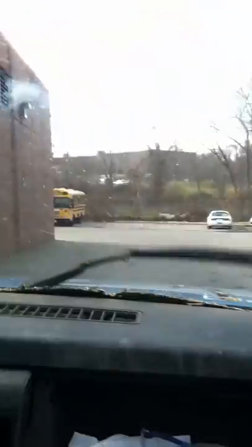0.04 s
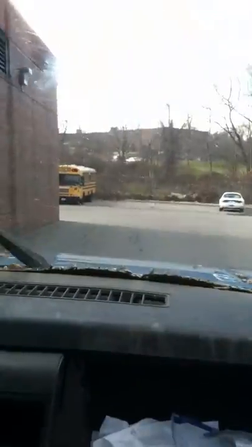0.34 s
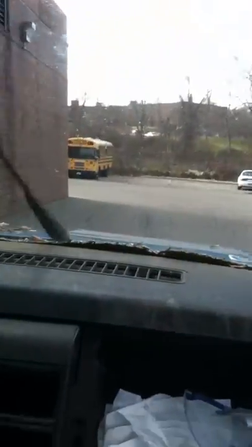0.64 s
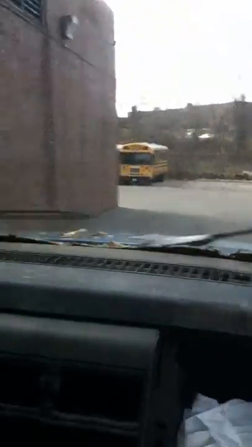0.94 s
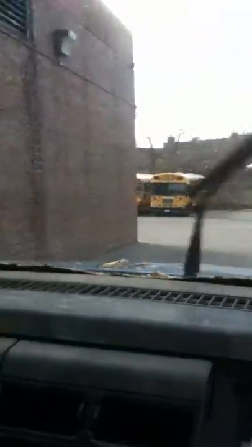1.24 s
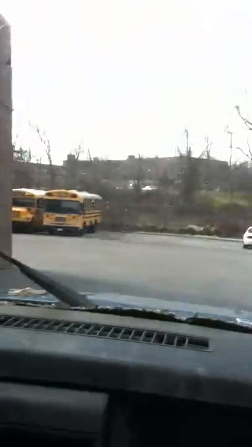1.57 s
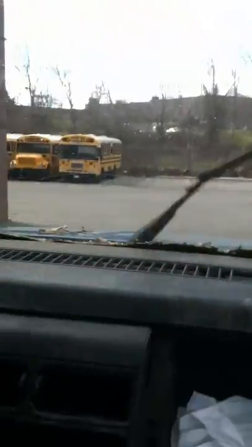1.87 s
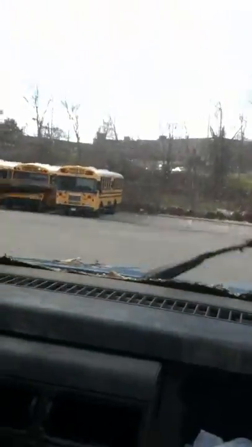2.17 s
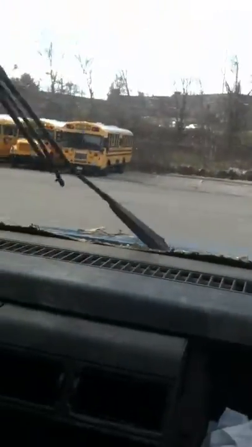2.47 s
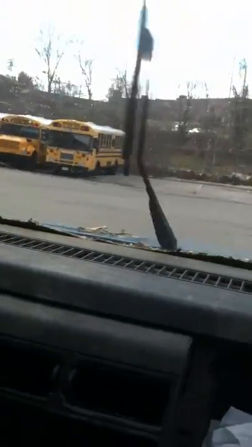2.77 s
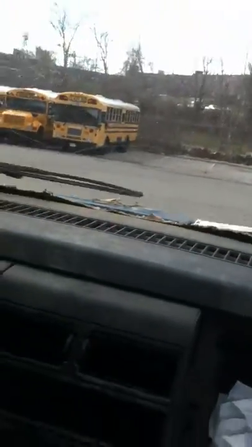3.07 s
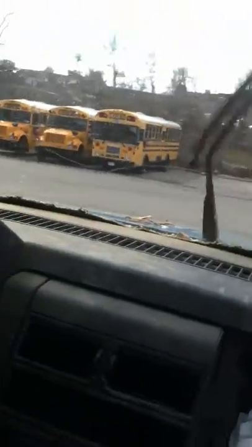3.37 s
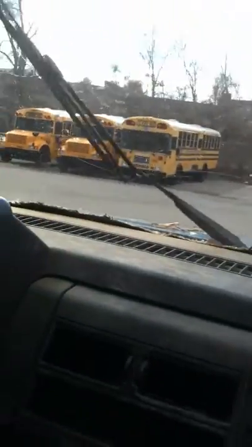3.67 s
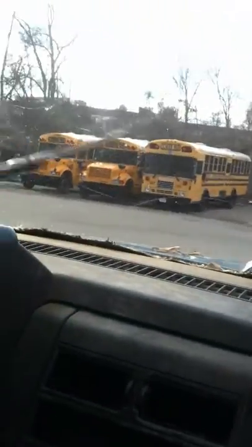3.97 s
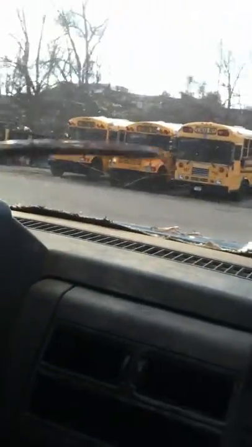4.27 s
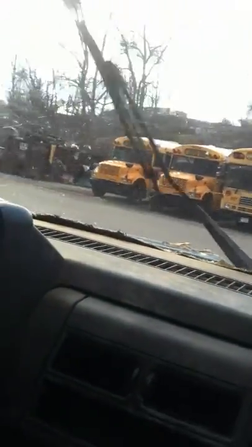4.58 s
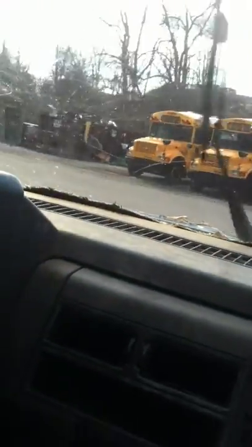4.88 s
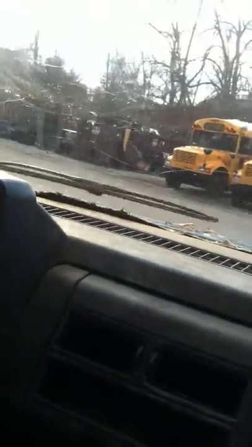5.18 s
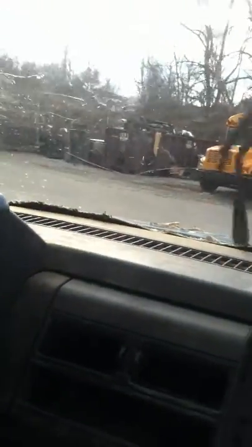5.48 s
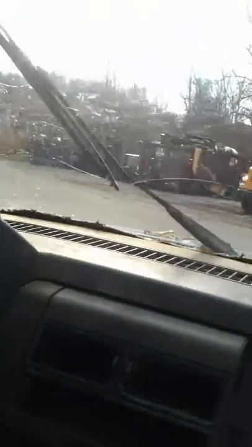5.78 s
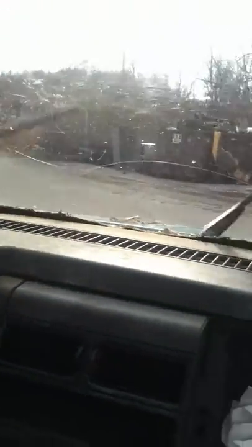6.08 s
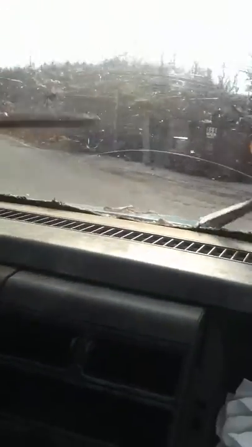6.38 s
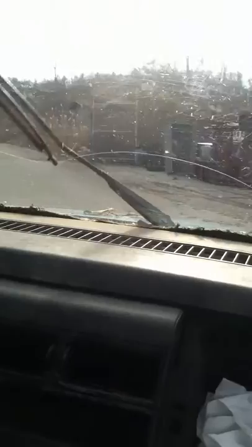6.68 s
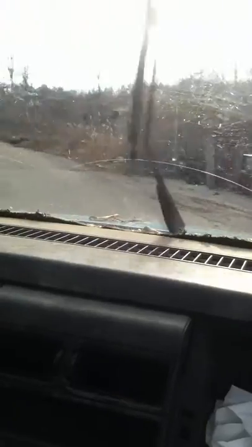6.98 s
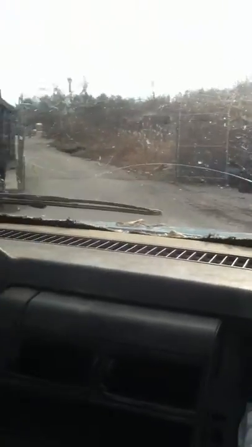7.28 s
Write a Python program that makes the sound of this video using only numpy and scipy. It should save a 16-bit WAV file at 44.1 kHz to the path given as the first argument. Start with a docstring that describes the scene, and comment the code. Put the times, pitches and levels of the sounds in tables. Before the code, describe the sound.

Wipers drag across a dry windshield, heard close up from inside a slowly moving vehicle. Each outward stroke starts with a clack and becomes a harsh, rasping screech of about half a second. The blade then flips with a soft thud and glides back with a thin, high squeak. This repeats seven times, about once a second, while the engine drones and the tyres rumble quietly underneath.

```python
"""Wipers on a dry windshield

Heard from inside a slowly moving vehicle. On each outward stroke the rubber lip catches, then sticks
and slips about a thousand times a second, in many patches at once: a harsh screech. The blade flips
over with a clack and glides back with thin squeaks. Below, the engine drones and the tyres rumble."""
import sys
import numpy as np
from scipy import signal
from scipy.fft import rfft, irfft, next_fast_len
from scipy.io import wavfile
from scipy.ndimage import uniform_filter1d, map_coordinates

SR = 44100
rng = np.random.default_rng(int(sys.argv[2]) if len(sys.argv) > 2 else 0)


def log_audio(samples):
    """Write samples as a 16-bit WAV file to the path given in sys.argv[1]."""
    # one column per channel
    frames = np.atleast_2d(samples).T
    # limit to full scale, then quantise
    limited = np.clip(frames, -1, 1)
    pcm = np.round(limited * 32767).astype(np.int16)
    wavfile.write(sys.argv[1], SR, pcm)


N = 327663

# Outward strokes. Each row: start and length in seconds, then levels in dB of the rasp, the judder
# (within the rasp), and the groan, shriek, squeal and squawk.
STROKES = [(0.1951, .459, -16.3, -27, -4, -1, -8, -9), (1.2406, .459, -17.6, -28, -5, -1, -8, -9),
           (2.2947, 0.46, -17.5, -26, -12, -2, -6, -1), (3.3408, 0.46, -16.8, -24, -14, -2, -8.5, -1.5),
           (4.3839, .469, -15.8, -20, -7.5, -2.5, -5.5, -3),
           (5.4344, 0.47, -16.8, -21, -4.5, -1.5, -4.5, -3), (6.4863, .461, -17.2, -24, .5, -2, -4.5, -7)]
# How each tone moves. Each row: seconds into the stroke, pitch in Hz, level in dB before the stroke's own.
SQUEAL_PATH = [(.02, 905, -38), (.15, 905, -34), (.24, 976.4, -24.5), (.38, 985, -24), (.465, 1078, -29)]  # climbs all through the stroke
SHRIEK_PATH = [(.03, 1810, -34.5), (.075, 1810, -30.5), (.11, 1715, -23.5), (.135, 1790, -15.5),
               (.165, 1813, -26.5), (.3, 1810, -29)]  # loudest in the first half
GROAN_PATH = [(.028, 889, -28), (.058, 915, -21), (.088, 892, -22.5), (.112, 855, -23), (.138, 875, -29)]  # sags early on
SQUAWK_PATH = [(-.125, 2126, -24.5), (-.06, 2097, -23), (-.038, 1938, -21.5), (-.018, 2077, -19.5),
               (0, 2221, -39.5)]  # dips, then rises; timed from the stroke's end
# What each tone is made of. Each row: harmonic (a multiple of the slip rate), level in dB.
SQUEAL_TONE = [(1, 0.5), (2, -5.5), (3, 0.5), (4, -7.5), (5, -24.5), (6, -9)]
SHRIEK_TONE = [(2, -2.5), (3, -6), (4, -12.5), (5, -8.5), (7, -15)]
GROAN_TONE = [(1, 0), (2, -7), (3, -11.5), (4, -2), (5, -10), (7, -12)]
SQUAWK_TONE = [(2, 0), (3, -11), (4, -8), (6, -15), (8, -26)]
# The steel arm's ring. Each row: pitch in Hz, level in dB, seconds to fade by 60 dB.
ARM_RING = [(1050, -62, .4), (2190, -57, .8), (3880, -61, .6), (5250, -68, .8)]
GRIP_S, BUILD_S, RELEASE_S = .0078, .037, .057  # the lip takes hold, drags harder, lets go
JUDDER_START_HZ, JUDDER_END_HZ = 290, 385
def screeches():
    """Dry rubber rasps over the glass while tones come and go; the arm rings after the lip lets go."""
    out, ring_t = np.zeros(N), np.arange(SR // 2) / SR
    ring = sum(amp(db - 60 * ring_t / fade_s) * np.sin(2 * np.pi * hz * ring_t)
               for hz, db, fade_s in ARM_RING)
    for start, length, rasp_db, judder_db, groan_db, shriek_db, squeal_db, squawk_db in STROKES:
        n = int(length * SR)
        t = np.arange(n) / SR
        pressure = np.clip(np.minimum((t - GRIP_S) / BUILD_S, (length - t) / RELEASE_S), 1e-3, 1)
        drag = pressure * amp(rasp_db + .7 * wobble(19, n))  # the glass is unevenly dry
        # the blade judders on its arm, faster as the stroke goes on
        judder_hz = np.linspace(JUDDER_START_HZ, JUDDER_END_HZ, n) * (1 + .08153 * wobble(70.35, n))
        judder = np.sin(phase_of(judder_hz)) * amp(4 * np.tanh(wobble(50, n)))
        squeal = lip_tone(SQUEAL_PATH, SQUEAL_TONE, t, judder,
                          rough=.42, flutter_db=7.5, drift=.014, grip_db=3.5)
        shriek = lip_tone(SHRIEK_PATH, SHRIEK_TONE, t, judder,
                          rough=.22, flutter_db=5.5, drift=.013, grip_db=2)
        squawk = lip_tone(SQUAWK_PATH, SQUAWK_TONE, t - length, judder,
                          rough=.2, flutter_db=5.5, drift=.012, grip_db=2)
        groan = lip_tone(GROAN_PATH, GROAN_TONE, t, judder,
                         rough=.08, flutter_db=2.5, drift=.006, grip_db=1)
        tones = pressure * amp(squeal_db) * squeal + amp(shriek_db) * shriek
        tones += amp(squawk_db) * squawk + amp(groan_db) * groan
        squeal_hz, _ = curves(SQUEAL_PATH, t)
        # the more of the lip slips in step, the less is left to rasp
        scrape = rasp(squeal_hz, judder) / np.sqrt(1 + .5 * power(tones, size=600) / drag ** 2)
        stroke = tones + drag * (scrape + amp(judder_db) * judder)
        add(out, start, stroke * signal.windows.tukey(n, .02))
        add(out, start + length, ring)
    return out


def lip_tone(path, harmonics, t, judder, rough, flutter_db, drift, grip_db):
    """A stretch of lip slips in step and sings; the path gives the pitch of its first listed harmonic."""
    n = len(t)
    path_hz, db = curves(path, t)
    wander = drift * (wobble(80, n) + wobble(20, n))
    slip_hz = path_hz / round(harmonics[0][0]) * (1 + wander)
    phase = phase_of(slip_hz) + rough * wobble(350, n) + .115 * judder
    tone = np.zeros(n)
    for k, level in harmonics:
        flutter = amp(flutter_db * np.tanh(wobble(65.32, n)))
        tone += amp(level) * unit(flutter * np.sin(round(k) * phase + rng.uniform(0, 2 * np.pi)))
    fade = np.clip(np.minimum(t - path[0][0], path[-1][0] - t) / .0037 + 1, 0, 1)
    return tone * amp(db + grip_db * np.tanh(wobble(28, n))) * fade


# Patches of the lip. Each row: slip rate as a multiple of the squeal's pitch, level in dB.
LIP_PATCHES = [(.84, -7), (.91, -5), (1.01, -5), (1.08, -1), (1.27, -6)]
# How glass and dashboard colour the rasp. Each row: frequency in Hz, level in dB.
GLASS_COLOUR = [(40, -59), (130, -34), (280, -13.5), (500, -15), (750, -10.5), (1100, -11), (1400, -6),
                (2000, -2.5), (2600, -1.5), (3500, -4), (4700, -2.5), (5200, -12), (6900, -11.5),
                (8600, -29), (12500, -65.5)]
# Where the blade likes to ring. Each row: frequency in Hz, width in Hz, boost in dB.
BLADE_PEAKS = [(345, 128, 12), (620, 100, 6.5), (3058, 140, 2), (3990, 180, 2), (5757, 207, 6.5)]
def rasp(pitch_hz, judder):
    """Patches of the lip slip out of step with each other and shake the glass."""
    def colour(hz):
        boost = sum(db / (1 + (2 * (hz - centre) / width) ** 2) for centre, width, db in BLADE_PEAKS)
        return along(GLASS_COLOUR, hz) + boost

    n = len(pitch_hz)
    force = amp(-8) * rng.standard_normal(n)
    for ratio, db in LIP_PATCHES:
        rate_hz = ratio * pitch_hz * np.exp(.022 * wobble(40, n))
        force += amp(db + 4 * wobble(35, n)) * slips(rate_hz, jitter=.028, scatter_db=2)
    # the patches share one spring: when one bites harder, the others ease
    force *= amp(1.07 * wobble(60, n)) / np.sqrt(power(force, size=500))
    return unit(coloured(force * (1 + .2 * judder), colour))


def slips(rate_hz, jitter, scatter_db):
    """One sharp pulse each time the rubber lets go, uneven in time and size."""
    n = len(rate_hz)
    cycles = np.cumsum(rate_hz) / SR
    count = int(cycles[-1])
    late, size = rng.standard_normal((count, 2)).T
    centres = np.interp(np.arange(count) + rng.random() + jitter * late, cycles, np.arange(n))[:, None]
    # a pulse falls between samples, so spread it over its neighbours
    nearby = centres.astype(int) + np.arange(-7, 9)
    offset = nearby - centres
    pulses = np.sinc(offset) * np.sinc(offset / 8) * amp(scatter_db * size)[:, None]
    train = np.bincount(np.clip(nearby, 0, n - 1).ravel(), pulses.ravel(), n)
    return unit(train - train.mean())


# The colour of a clack. Each row: frequency in Hz, level in dB.
CLACK_COLOUR = [(30, -44), (120, -23), (300, -4), (1100, -7), (1700, -0.5), (2300, -1.5), (3000, -8),
                (4000, 1), (5200, -5), (7500, -7.5), (12000, -73.5)]
# Each clack: seconds from the turn, peak in dB, treble setting in dB (-11.5 leaves the colour as it is).
TICK, CATCH, FLIP = (-.0505, -35, -26), (0, -14, -19), (.06, -28, -47)
def clacks():
    """The blade ticks and catches as a stroke starts, and flips over after it ends."""
    out, t = np.zeros(N), np.arange(SR // 5) / SR
    fade_s, treble_share = .03, [(3000, .018), (6000, .98)]
    for start, db, treble_db in every_stroke([TICK, CATCH], [FLIP]):
        rise_s = .000097 / amp(db)  # rubber gives way slowly under a gentle touch
        burst = rng.standard_normal(len(t)) * amp(-60 * t / fade_s) * (1 - np.exp(-t / rise_s))
        colour = lambda hz: along(CLACK_COLOUR, hz) + along(treble_share, hz) * (treble_db + 11.5)
        clack = coloured(burst, colour)
        add(out, start, amp(db) * clack / np.abs(clack).max())
    return out


# Thuds at a stroke's two ends. Each row: seconds from that end, peak in dB.
START_THUDS = [(-.103, -33)]
END_THUDS = [(.022, -30), (.07, -29)]
# Stray knocks of the body. Each row: start in seconds, peak in dB.
BODY_KNOCKS = [(2.326, -22.5), (2.932, -29)]
# The ring of the wiper rods and their cover. Each row: pitch in Hz, level in dB, seconds to fade by 60 dB.
THUD_RING = [(161.3, -5, 0.1), (267, -6.5, .12), (345.7, -2, 0.13), (405.3, -4.5, 0.077), (626, -9.5, 0.1),
             (976, -12, 0.098)]
def thuds():
    """The wiper rods take up their slack and the body knocks; each thud rings a little differently."""
    out, t = np.zeros(N), np.arange(SR // 5) / SR
    for start, db in every_stroke(START_THUDS, END_THUDS) + BODY_KNOCKS:
        ring = np.zeros(len(t))
        for hz, level, fade_s in THUD_RING:
            fade = amp(level + rng.normal(0, 2.6) - 60 * t / fade_s)
            pitch_hz = hz * rng.normal(1, .054)
            ring += fade * np.sin(2 * np.pi * pitch_hz * t + rng.uniform(0, 2 * np.pi))
        ring *= 1 - np.exp(-t / .0035)  # soften the start
        add(out, start, amp(db) * ring / np.abs(ring).max())
    return out


# Return strokes. Each row: the whistle's start and length in seconds, then levels in dB of the whistle,
# its lead-in chirp, its closing chirp and its undertone.
RETURNS = [(0.883, .058, -34.5, -45, -55, -62), (1.927, .066, -34, -46.5, -51, -44),
           (2.992, .058, -36.5, -58, -53, -65), (4.04, .052, -38, -57, -53, -65),
           (5.078, .068, -38, -44, -59, -64), (6.142, .055, -35, -42, -47, -60),
           (7.147, 0.097, -35.5, -40, -43, -42)]
# Now and then the lip snags. Each row: start and length in seconds, pitch in Hz, level in dB.
SNAGS = [(1.714, .025, 5625, -53), (4.866, 0.014, 5720, -36), (5.892, .022, 5670, -45)]
# Each small squeak: delay and length in seconds, pitch in Hz and, for the first two, level in dB.
FLIP_SQUEAK, FAINT_START = (.016, .04, 9457, -47.5), (-.11, .02, 5218, -56)
LEAD_IN, UNDERTONE, CLOSING = (-.022, .044, 5720), (.02, .05, 2225), (-.012, .042, 8095)
WHISTLE_HZ = 5180
def squeak_notes():
    """The lip squeaks as it folds over, then plays the same few notes on each return."""
    notes = every_stroke([], [FLIP_SQUEAK]) + SNAGS
    for start, length, whistle_db, lead_db, closing_db, under_db in RETURNS:
        notes += [timed_from(start, FAINT_START),
                  (start, length, WHISTLE_HZ, whistle_db),
                  (*timed_from(start, LEAD_IN), lead_db),
                  (*timed_from(start, UNDERTONE), under_db),
                  (*timed_from(start + length, CLOSING), closing_db)]
    return notes


# What a squeak is made of. Each row: multiple of its pitch, level in dB.
SQUEAK_TONE = [(1, 6), (.81, -19), (2, -27.5)]
SQUEAK_RISE, SQUEAK_FALL = .23, .52  # shares of a squeak's length
def squeaks(sag=.008, waver=.003, rough=.28, scratch_db=-22):
    """On the way back only the lip's edge sings: short, scratchy whistles that swell and sag in pitch."""
    out = np.zeros(N)
    for start, length, hz, db in squeak_notes():
        n = int(length * SR)
        progress = np.linspace(0, 1, n)
        pitch_hz = hz * (1 - sag * (progress - .5) + waver * wobble(205, n))
        phase = phase_of(pitch_hz) + rough * wobble(1100, n)
        swell = np.clip(np.minimum(progress / SQUEAK_RISE, (1 - progress) / SQUEAK_FALL), 0, 1)
        swell *= amp(db + 1.6 * wobble(110, n))
        whistle = sum(amp(level) * np.sin(k * phase) for k, level in SQUEAK_TONE)
        add(out, start, swell * (whistle + amp(scratch_db) * noise(HISS_COLOUR, n)))
    return out


# How long the cabin echoes. Each row: frequency in Hz, seconds to fade by 60 dB.
CABIN_FADE = [(150, 0.22), (1000, .09), (4000, .075), (10000, .065)]
def cabin_echo(sound):
    """The small cabin answers with a short, dense echo in which low notes last longest."""
    hz, t, spectrum = signal.stft(rng.standard_normal(SR // 4), SR, nperseg=256)
    fade = amp(-60 * t / along(CABIN_FADE, hz)[:, None])
    _, tail = signal.istft(spectrum * fade, SR, nperseg=256)
    return signal.fftconvolve(sound, tail / np.linalg.norm(tail))[:N]


# The hiss in the swish and the squeaks. Each row: frequency in Hz, level in dB.
HISS_COLOUR = [(300, -9.5), (1500, -7.5), (2200, 2), (3000, -4), (4300, 3), (5200, -5.5), (7000, -3),
               (9000, -15.5), (12000, -46)]
def swish():
    """Air and gliding rubber hiss faintly; the hiss dips while the blade rests at either end."""
    resting = np.zeros(N)
    for start, pause_s in every_stroke([(-.17, .17)], [(.025, .16)]):
        add(resting, start, np.hanning(int(pause_s * SR)))
    level_db = -55.5 - 4.3 * resting + 3.3 * wobble(40, N) + .66 * wobble(5.4, N)
    return amp(level_db) * noise(HISS_COLOUR, N)


# How loud the engine is. Each row: time in seconds, level in dB before trim_db is added.
ENGINE_LEVELS = [(0.0, -54), (0.12, -44.5), (1.38, -47), (1.41, -42.5), (2.26, -42), (3.29, -54.5),
                 (4.14, -42), (4.72, -50), (6.52, -43.5), (6.75, -53), (7.33, -40.5), (7.43, -53)]
def engine(firing_hz=159.6, drift=.0252, trim_db=-2.5):
    """The engine's firing note booms in the cabin, with faint notes an octave below and above."""
    level_db, = curves(ENGINE_LEVELS, np.arange(N) / SR)
    pitch_hz = firing_hz * (1 + drift * wobble(7, N))
    phase = phase_of(pitch_hz) + .28 * wobble(30, N)
    drone = np.sin(phase) + amp(-21.5) * np.sin(phase / 2) + amp(-22.5) * np.sin(2 * phase)
    return amp(level_db + trim_db) * unit(amp(2.2 * wobble(25, N)) * drone)


# How loud the tyres are. Each row: time in seconds, level in dB.
TYRE_LEVELS = [(0.0, -43), (0.68, -46.5), (2.34, -41.5), (2.54, -45), (3.68, -45.5), (4.12, -45),
               (4.86, -46.5), (5.77, -43), (7.12, -42), (7.43, -42.5)]
# The colour of their rumble. Each row: frequency in Hz, level in dB.
RUMBLE_COLOUR = [(20, -44), (40, -27.5), (65, -13), (120, 4), (200, -2.5), (330, -2), (480, -8.5),
                 (800, -12), (1000, -14), (1400, -21), (3000, -31.5), (12000, -98.5)]
def tyres():
    """The tyres rumble, a little louder and softer over the bumps."""
    level_db, = curves(TYRE_LEVELS, np.arange(N) / SR)
    return amp(level_db + 1.8 * wobble(14, N)) * noise(RUMBLE_COLOUR, N)


# Seams in the road. Each row: middle of the jolt in seconds, level in dB.
ROAD_SEAMS = [(0.099, -41), (4.311, -40)]
# The cabin's boom. Each row: frequency in Hz, level in dB.
BOOM_COLOUR = [(50, -28), (90, -6), (125, 5), (170, -12), (400, -40), (1500, -88)]
def jolts(length_s=.18):
    """Each seam the tyres cross makes the cabin boom briefly."""
    out, n = np.zeros(N), int(length_s * SR)
    for middle, db in ROAD_SEAMS:
        add(out, middle - length_s / 2, amp(db) * np.hanning(n) * noise(BOOM_COLOUR, n))
    return out


def every_stroke(at_start, at_end):
    """Repeat rows for all strokes, timed from each one's start and from its end."""
    events = []
    for start, length, *_ in STROKES:
        events += [timed_from(start, row) for row in at_start]
        events += [timed_from(start + length, row) for row in at_end]
    return events


def timed_from(moment, row):
    """Turn the delay that opens a row into a time in the scene."""
    return (moment + row[0], *row[1:])


def amp(db):
    """Turn decibels into a number to multiply by."""
    return 10 ** (np.asarray(db) / 20)


def unit(x):
    """Scale x to an average power of 1."""
    return x / np.sqrt(np.mean(x ** 2) + 1e-20)


def power(x, size):
    """The running average of x squared, over size samples."""
    return np.abs(uniform_filter1d(x ** 2, size=size)) + 1e-12


def phase_of(hz):
    """The angle a wave has turned through as its pitch changes."""
    return 2 * np.pi * np.cumsum(hz) / SR


def along(points, hz):
    """Read a table between its frequencies, with octaves evenly spaced."""
    known_hz, values = np.transpose(points)
    return np.interp(np.log(hz + 1), np.log(known_hz + 1), values)


def curves(rows, t):
    """Read each column after the first at the times t."""
    times, *columns = np.transpose(rows)
    return [np.interp(t, times, column) for column in columns]


def wobble(rate, n):
    """A smooth curve of n samples through rate random points a second."""
    return map_coordinates(rng.standard_normal(int(n * rate / SR) + 4), [np.arange(n) * rate / SR])


def coloured(x, level):
    """Turn each frequency in x up or down by level(hz) decibels."""
    size = 2 * next_fast_len(len(x) // 2 + 4096)
    cepstrum = irfft(np.log(amp(level(np.fft.rfftfreq(size, 1 / SR)))))
    # keeping only the first half makes the filter ring after a sound, never before it
    cepstrum[1:size // 2] *= 2
    cepstrum[size // 2 + 1:] = 0
    return irfft(rfft(x, size) * np.exp(rfft(cepstrum)))[:len(x)]


def noise(colour, n):
    """Noise shaped by a colour table, with an average power of 1."""
    return unit(coloured(rng.standard_normal(n), lambda hz: along(colour, hz)))


def add(track, start, x):
    """Mix x into the track from start seconds on."""
    i = max(round(start * SR), 0)
    track[i:i + len(x)] += x[:len(track) - i]


def scene():
    """Wipers close by, their echo in the cabin, and the vehicle underneath."""
    wipers = screeches() + clacks() + thuds() + squeaks()
    return (wipers + amp(-7.5) * cabin_echo(wipers) + swish() + engine() + tyres() + jolts())[None]


PEAK_LIMIT, TOP_HZ = .8, 10800
def record(dry):
    """Round off the tallest peaks and cut the highest treble."""
    rounded = dry / (1 + np.abs(dry / PEAK_LIMIT) ** 8) ** (1 / 8)
    hz = np.fft.rfftfreq(N, 1 / SR)
    return irfft(rfft(rounded) / np.sqrt(1 + (hz / TOP_HZ) ** 30), N)


dry = scene()
out = record(dry)
log_audio(out)
```